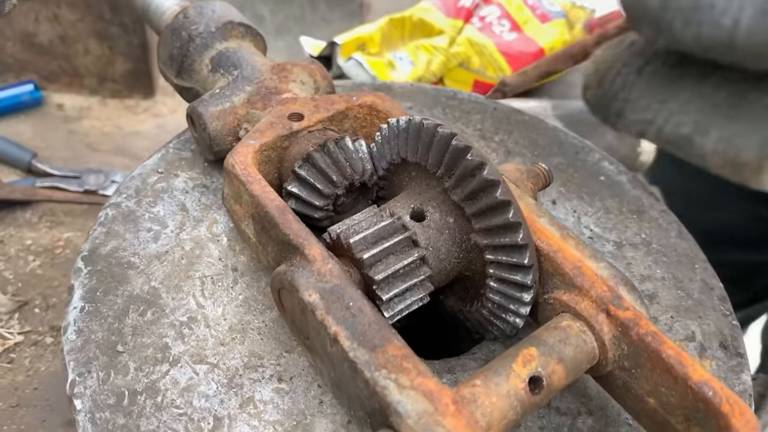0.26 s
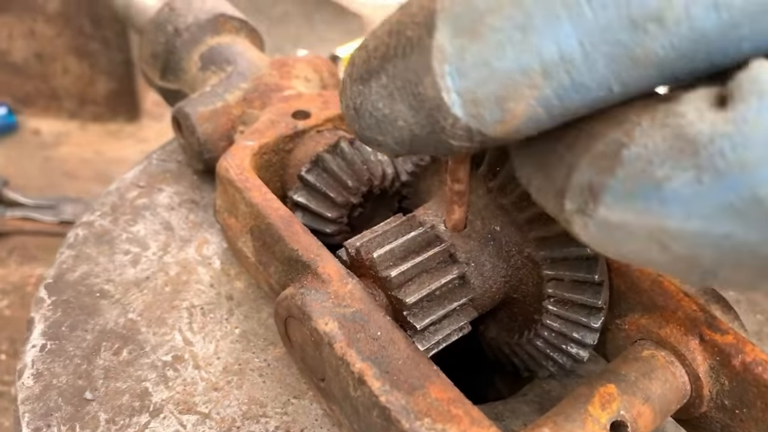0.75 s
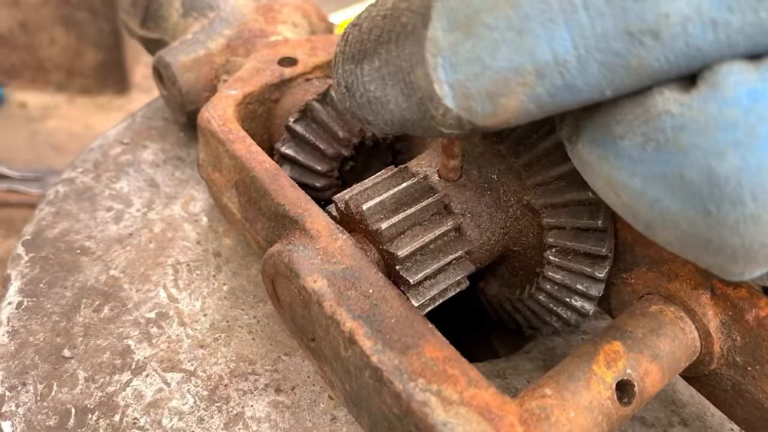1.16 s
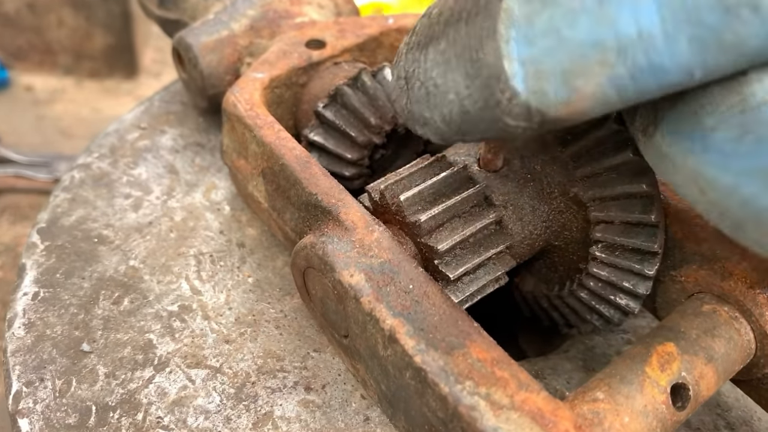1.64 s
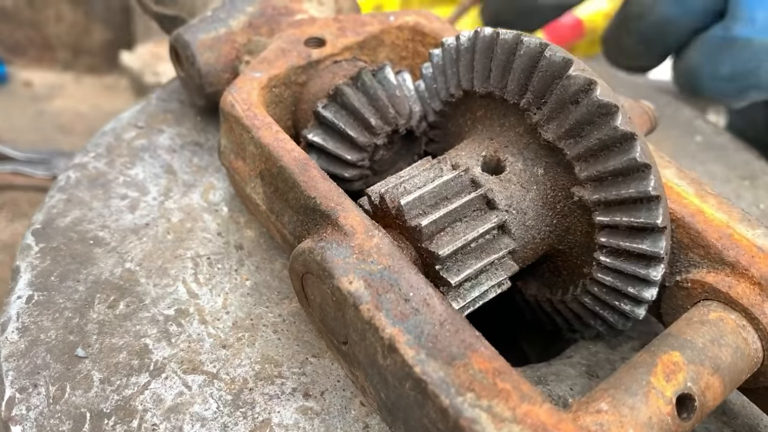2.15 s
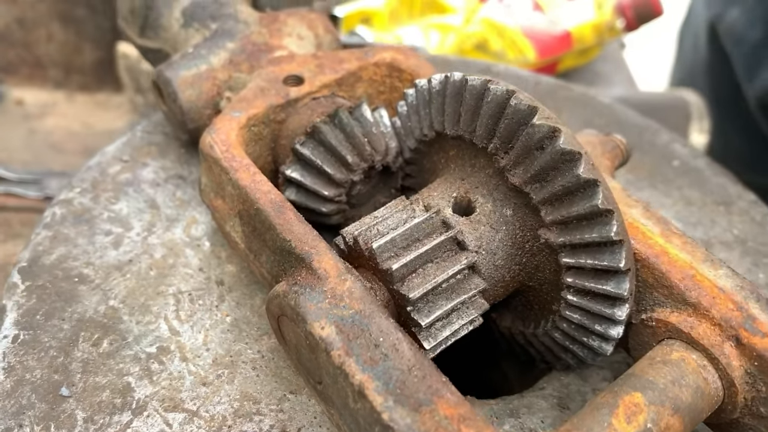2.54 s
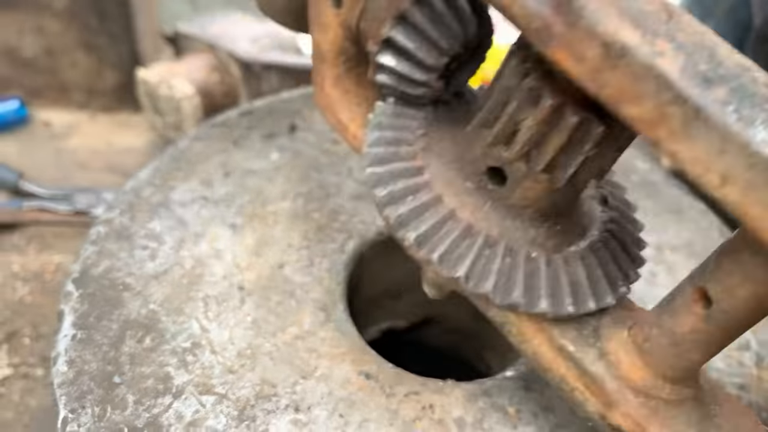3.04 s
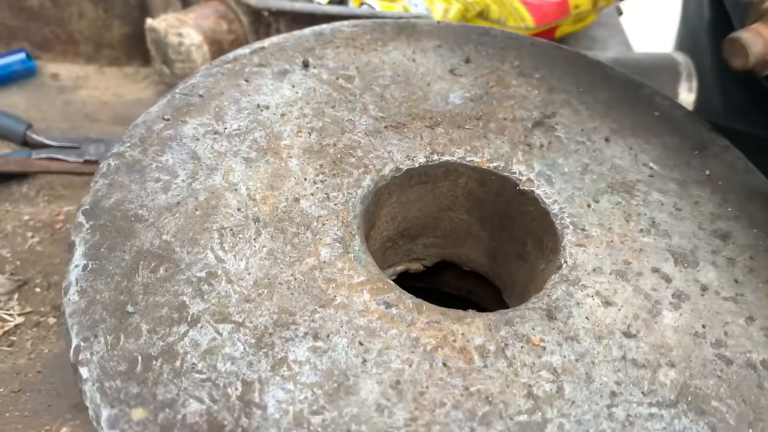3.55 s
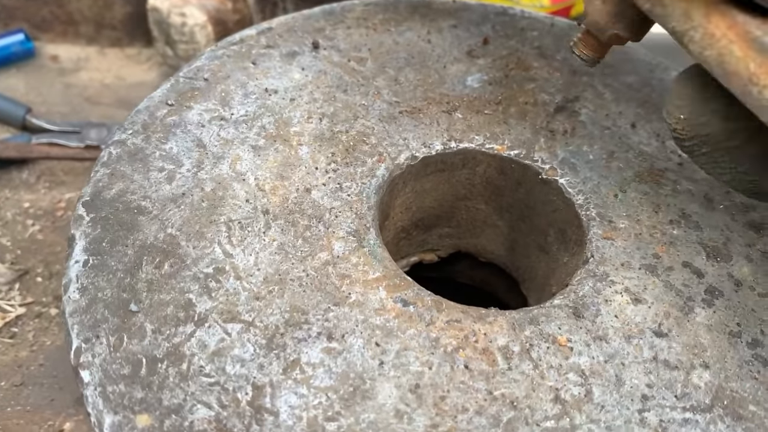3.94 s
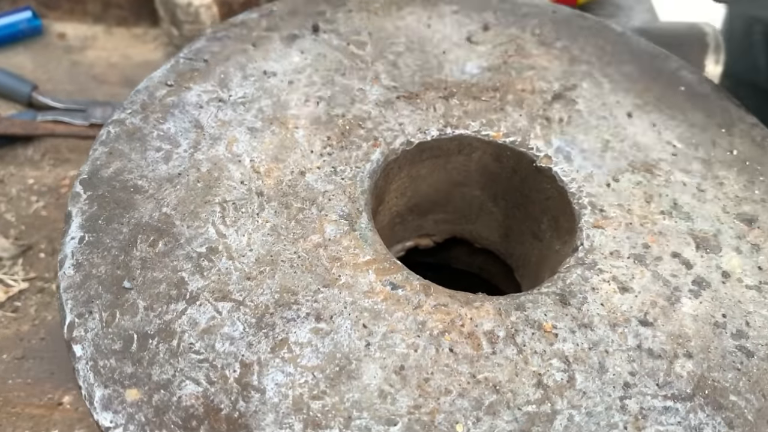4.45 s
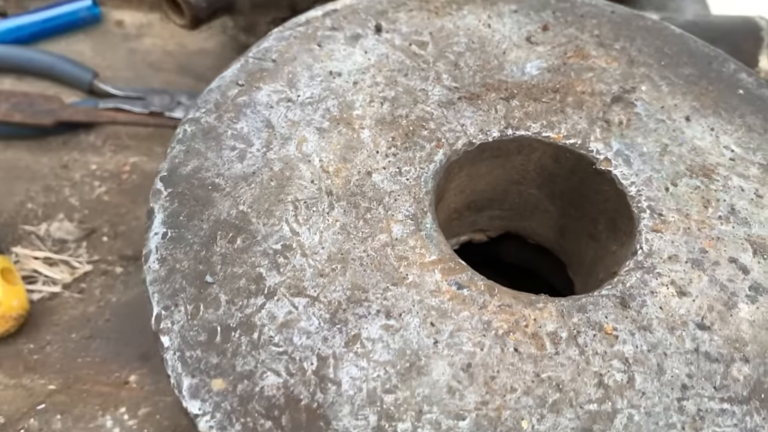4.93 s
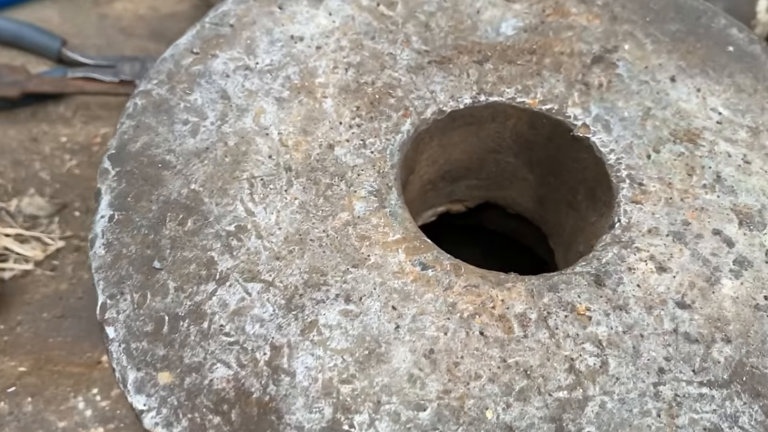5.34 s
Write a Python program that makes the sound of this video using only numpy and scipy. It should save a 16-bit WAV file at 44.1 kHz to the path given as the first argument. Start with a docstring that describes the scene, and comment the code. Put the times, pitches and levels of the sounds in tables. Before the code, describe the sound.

Close handheld stereo in an open workshop, over faint low rumble. Gloves rustle and steel scrapes rust; a sharp tick and clank come near one second. Just after two seconds a rapid cluster of loud clanks carries a short, very high pin ring. Quiet scuffs follow, then two hard, heavy clunks set the gear frame down.

```python
"""A gloved hand works a steel punch in the hole of a rusty gear set on a stone stand in an open workshop.
First glove rustle, rubbing and scraping, made of grainy shaped noise, lie over a low outdoor rumble.
Soon the punch ticks and the heavy frame clunks: short noise forces set ringing modes going, and the stand rocks.
After two seconds a pin rings as it is freed, from clean clicks; faint whines of narrow noise follow.
Late heavy clunks put the set down aside. Two microphone ports hear the treble out of step."""
import sys
import numpy as np
from scipy import signal
from scipy.fft import rfft, irfft, next_fast_len
from scipy.io import wavfile
from scipy.ndimage import uniform_filter1d

SR = 44100
rng = np.random.default_rng(int(sys.argv[2]) if len(sys.argv) > 2 else 0)


def wav_out(sig):
    """Save sig, one row per channel (or a flat mono array), as 16-bit PCM at SR to the path in sys.argv[1]."""
    wavfile.write(sys.argv[1], SR, np.round(np.clip(np.atleast_2d(sig).T, -1, 1) * 32767).astype(np.int16))


N = 246519  # length in samples

# Knocks of punch and gear set: t/s, clunk level/dB, clunk centre f/Hz, clank level/dB, tick level/dB, contact/ms
KNOCK_TABLE = [(0.108, -87, 550, -84, -53.5, 4.3), (0.157, -52, 230, -61, -97, 13),
               (0.298, -52.5, 776, -62, -92, 13), (0.718, -43, 324, -66, -71, 7.9),
               (0.893, -27.5, 348, -21, -24, 4.06), (0.984, -34, 393, -48, -55, 10.3),
               (1.028, -33, 500, -25, -22.5, 11.6), (1.067, -35.5, 470, -41.5, -54, 5.0),
               (1.102, -45.5, 483, -77, -76, 6.1), (1.424, -52.5, 377, -65, -63, 8.3),
               (1.602, -41, 390, -55.5, -55.5, 22), (1.635, -60, 460, -43, -38, 5),
               (1.71, -68.5, 450, -65.5, -84, 4.9), (2.002, -31.5, 430, -49, -62.5, 9.8),
               (2.1, -28.5, 530, -34.5, -19.5, 2), (2.141, -28, 540, -25, -21, 6.7),
               (2.164, -10.5, 670, -13, -39, 8.8), (2.207, -20.5, 570, -26, -40.5, 14),
               (2.226, -25.5, 510, -53.5, -57.5, 9.7), (2.262, -29, 448, -41, -71.5, 5.3),
               (2.425, -40, 433, -82, -81, 6.2), (2.603, -41.5, 422, -80, -74, 6.8),
               (3.111, -69, 552, -57.5, -66, 13.4), (3.241, -64.5, 745, -66, -46.5, 7.7),
               (4.506, -33.5, 373, -65.5, -58, 9.1), (4.533, -33.5, 337, -58.5, -65, 8.1),
               (4.595, -18.5, 545, -28, -42.5, 15.6), (4.602, -10, 620, -13, -24, 3.7),
               (4.617, -19, 620, -32, -50, 18.5), (4.834, -48, 427, -65, -70, 6.6),
               (4.874, -12, 673, -19, -32, 15), (4.884, -12.5, 620, -23.5, -33, 12)]
# Ringing modes of the heavy gear frame: f/Hz, level/dB, time to fall by 60 dB/s
FRAME_MODES = [(176, -14, .06), (240, -20, .05), (379.8, 1, 0.048), (441, -7, 0.08), (528, -5.5, 0.061),
               (609.5, 0.5, 0.044), (674, -14, 0.017), (1009, -7.5, 0.056), (1243, -2.5, 0.071),
               (1217, -17.5, 0.082)]
# Ringing modes of the gear teeth: f/Hz, level/dB, time to fall by 60 dB/s
TEETH_MODES = [(1766, -4, 0.15), (1874, -3, .04), (1994, 2, 0.037), (2400, -2.5, 0.013), (2450, 1, 0.033),
               (2665, 6, 0.03), (2900, 6, .04), (3230, -3.5, .04), (3540, -6.5, 0.033), (3870, -4, 0.057),
               (4400, -7.5, 0.073), (4640, -6, 0.048), (4980, -8.5, .03), (5370, -7.5, 0.024),
               (6780, -5.5, 0.0074), (6260, -6.5, .03), (6507, -10, 0.031)]


def from_db(db):
    """Turn decibels into a gain."""
    return 10 ** (np.asarray(db) / 20)


def rms_one(x):
    """Scale to an rms (average strength) of 1."""
    return x / np.sqrt(np.mean(x ** 2) + 1e-20)


def top_one(x):
    """Scale so that the loudest 5 ms have rms 1."""
    return x / np.sqrt(uniform_filter1d(x ** 2, size=220).max())


def band(x, low_hz, high_hz):
    """Keep the sound between two frequencies with a Butterworth band-pass."""
    sos = signal.butter(3, [low_hz, min(high_hz, .45 * SR)], "band", fs=SR, output="sos")
    return signal.sosfilt(sos, x)


def ring(force, hz, t60):
    """Drive one damped mode: a unit click sets a sine of height 1 ringing, 60 dB down after t60 seconds."""
    radius = from_db(-60 / (t60 * SR))
    angle = 2 * np.pi * hz / SR
    # the tiny offset keeps the filter's numbers from becoming too small
    return signal.lfilter([0, np.sin(angle)], [1, -2 * radius * np.cos(angle), radius * radius], force + 1e-18)


def drift(rate_hz):
    """Make a slow random wander of rms 1 by smoothing noise."""
    r = np.exp(-2 * np.pi * rate_hz / SR)
    noise = rng.standard_normal(N + SR)
    return rms_one(signal.lfilter([1], [1, -2 * r, r * r], noise)[SR:])  # skip the start-up second


def coloured(x, spectrum):
    """Shape noise by a spectrum in dB per Hz, joined up on a log frequency scale, and scale to rms 1."""
    size = next_fast_len(N)
    hz, db = np.transpose(spectrum)
    log_hz = np.log(np.maximum(np.arange(size // 2 + 1) * SR / size, 1))
    gain = from_db(np.interp(log_hz, np.log(hz), db, -80, -80))
    return rms_one(irfft(rfft(x, size) * gain, size)[..., :N])


def rubbing(spectrum, alike, grit_db, flicker_db):
    """Rub with noise of uneven grains whose level flickers, partly different in each channel."""
    grains = from_db(grit_db * np.minimum(rng.exponential(1, N), 5))
    shared, own = rng.standard_normal((2, N)) * grains
    alike = np.clip(alike, -.995, .995)
    pair = np.sqrt(1 + alike) * shared + np.sqrt(1 - alike) * own * [[1], [-1]]
    return coloured(pair * from_db(flicker_db * drift(25)), spectrum)


def strike(force, modes, stretch, centre_hz, octaves, scatter_db=3):
    """Feed a force into the modes of a body: those near centre_hz ring most, each with some luck."""
    luck_db = rng.normal(0, scatter_db, len(modes))
    rings = 0
    for (hz, db, t60), more_db in zip(modes, luck_db):
        near_db = -6 * (np.log2(hz / centre_hz) / octaves) ** 2
        rings = rings + from_db(db + near_db + more_db) * ring(force, hz, t60 * stretch) / np.sqrt(t60)
    return band(rings, centre_hz / 2.2, centre_hz * 3.0)  # soft contact and small body: no boom, no edge


def blows(table, modes, scatter_db):
    """Send clean clicks into lightly damped modes; each click wakes each mode by a slightly random amount."""
    at = [round(s * SR) for s, db in table]
    blow_db = np.array(table)[:, 1]
    out = np.zeros(N)
    for hz, level_db, t60 in modes:
        clicks = np.zeros(N)
        clicks[at] = from_db(blow_db + level_db + rng.normal(0, scatter_db, len(at)))
        out += ring(clicks, hz, t60)
    return out


def handling():
    """Rumble, rubbing on stone, steel scraping on rust and glove cloth: shaped noises with moving levels."""
    # Background levels: t/s, rumble level/dB, dull rub level/dB, scrape level/dB, rustle level/dB
    background = [(0.0, -60, -70.5, -73, -63.5), (0.28, -56.5, -65.5, -72, -71),
                  (0.78, -55, -66.5, -68.5, -66.5), (1.05, -50, -63, -65, -66),
                  (1.25, -56.5, -75, -63, -84), (1.341, -58, -72.5, -83.5, -78),
                  (1.421, -58, -70.5, -72, -72), (1.499, -56, -65, -73.5, -70.5),
                  (1.66, -58, -65, -69.5, -70), (1.78, -59.5, -69, -73.5, -67.5),
                  (1.95, -58.5, -66, -69, -60), (2.18, -48, -52.5, -54.5, -62.5),
                  (2.38, -57.5, -70, -75.5, -70.5), (2.699, -62, -74.5, -81.5, -76),
                  (2.92, -58.5, -72.5, -77, -69), (3.2, -60, -66.5, -69.5, -66),
                  (3.551, -62, -69.5, -69.5, -64), (3.65, -59.5, -75, -76, -69.5),
                  (3.95, -61.5, -74.5, -75, -69), (4.25, -60, -66, -65.5, -59),
                  (4.48, -58.5, -66.5, -69, -62), (4.64, -49, -62, -69, -72), (4.8, -58, -63.5, -72.5, -73),
                  (4.97, -52.5, -63.5, -70, -69.5), (5.25, -66.5, -77, -84.5, -79),
                  (5.38, -57, -73, -75, -72.5), (5.59, -61.5, -68, -77.5, -75.5)]
    # Spectra of the four noises, each: f/Hz, level per Hz/dB
    rumble_spectrum = [(12, -38), (20, -10.5), (59, -2), (124, -8), (182, -15), (211, -17.5), (300, -28),
                       (390, -50.5), (660, -120)]
    rub_spectrum = [(110, -22), (170, 0.5), (270, -3), (520, -7), (800, -9), (1400, -13.5), (2000, -36.5)]
    scrape_spectrum = [(900, -25), (1500, -0.5), (2500, -1.5), (4000, -2), (6000, -4.5), (7600, -4.5),
                       (9000, -28.5)]
    rustle_spectrum = [(7000, -21.5), (8500, -2.5), (11000, -3), (13500, 0), (15800, 4.5), (16600, -24.5)]
    s, *levels = np.transpose(background)
    rumble_db, rub_db, scrape_db, rustle_db = [np.interp(np.arange(N) / SR, s, level) for level in levels]
    rumble = rubbing(rumble_spectrum, .8, grit_db=0, flicker_db=2.5)
    rub = rubbing(rub_spectrum, 0.21, grit_db=3.0, flicker_db=2.5)
    scrape = rubbing(scrape_spectrum, 0.34, grit_db=3.0, flicker_db=2.0)
    rustle = rubbing(rustle_spectrum, 1.0, grit_db=1.5, flicker_db=1.5)
    steady = from_db(rumble_db) * rumble + from_db(rub_db) * rub
    steady += from_db(scrape_db) * scrape + from_db(rustle_db) * rustle
    return steady + scuffs(rub, scrape, rustle)


def knocks():
    """Rough faces chatter for some ms: the frame clunks, the teeth clank, the contact itself cracks and ticks."""
    even_clank_hz, tick_db_per_octave = 4580, 24.5  # clank centre if tick equals clank; sharper ticks clank higher
    ring_factor, ring_per_db = .45, 0.22  # ring length if clank equals clunk; duller knocks ring longer
    soft_db, soft_reach = -30, 1.6  # softer clunks are padded: little above this multiple of their centre
    tick_reach = 3.3  # top of the tick over the clank centre
    out = np.zeros((2, N + SR))
    t = np.arange(SR // 4) / SR
    for s, clunk_db, clunk_hz, clank_db, tick_db, contact_ms in KNOCK_TABLE:
        clank_hz = even_clank_hz * 2 ** ((tick_db - clank_db) / tick_db_per_octave)
        clank_hz = np.clip(clank_hz, 1800, 6800)
        stretch = np.clip(ring_factor + ring_per_db * (clunk_db - clank_db), .15, 1)
        pan_db = rng.normal(0, 2)

        phase = t / (contact_ms / 1000)
        chatter = np.minimum(phase * 3.6, 1) * np.exp(-phase ** 2)
        force, own = rng.standard_normal((2, len(t))) * chatter
        wide = force + .65 * own * [[1], [-1]]  # the teeth radiate unevenly to both sides

        crack = top_one(band(wide, clank_hz / 2.1, clank_hz * 1.685))
        clank = top_one(strike(wide, TEETH_MODES, stretch, clank_hz, octaves=9.7)) + from_db(1) * crack
        clunk = strike(force, FRAME_MODES, stretch, clunk_hz, octaves=.9)
        if clunk_db < soft_db:
            clunk = band(clunk, 100, clunk_hz * soft_reach)
        tick = band(force, 9100, np.clip(clank_hz * tick_reach, 10500, 16300))

        sound = from_db(clunk_db) * top_one(clunk) + from_db(clank_db) * top_one(clank)
        sound += from_db(tick_db) * top_one(tick)
        at = round(s * SR)
        out[:, at:at + len(t)] += sound * from_db([[pan_db / 2], [-pan_db / 2]])
    return out[:, :N]


def echoes(x):
    """Nearby things scatter a short, dull tail of fading noise, different in each channel."""
    t60_s, rise_s = .07, 0.022
    t = np.arange(SR // 4) / SR
    tail = band(rng.standard_normal((2, len(t))), 200, 7000)
    tail = tail * from_db(-60 * t / t60_s) * np.minimum(t / rise_s, 1)
    tail = tail / np.sqrt(np.sum(tail ** 2) / 2)
    return signal.fftconvolve(x[None], tail, axes=1)[:, :N]


def scuffs(rub, scrape, rustle):
    """Short strokes switch the rubbing on; it sets the frame humming and the nearest teeth singing."""
    # Scuffs and rattles: start t/s, end t/s, rub level/dB, scrape level/dB, rustle level/dB, scrape centre f/Hz
    strokes = [(0.156, 0.187, -53, -64, -70, 2000), (0.246, 0.324, -64.5, -93, -102, 1720),
               (0.472, 0.577, -61, -74, -66, 1600), (0.616, 0.658, -59, -69.5, -58.5, 2800),
               (0.855, 0.888, -65, -59, -47.5, 1890), (0.877, 1.018, -61, -74, -63, 2610),
               (1.024, 1.072, -49, -53, -43.5, 2600), (1.122, 1.297, -74, -59, -62, 3550),
               (1.163, 1.254, -50.5, -47.5, -50, 4700), (1.396, 1.483, -63.5, -67, -59.5, 5540),
               (1.592, 1.702, -60, -65, -60, 2580), (1.992, 2.043, -48, -59, -82, 2020),
               (2.015, 2.093, -47, -83, -80, 1500), (2.094, 2.178, -43.5, -47.5, -33.5, 6900),
               (2.133, 2.197, -34.5, -32, -47, 2640), (2.16, 2.25, -32, -40.5, -59.5, 1458),
               (2.25, 2.316, -38, -67, -56.5, 1500), (2.309, 2.4, -60, -74, -71.5, 2020),
               (3.017, 3.059, -83, -70.5, -64.5, 1910), (3.102, 3.17, -67.5, -66.5, -64, 2104),
               (3.241, 3.285, -81, -64, -55, 6450), (3.345, 3.514, -88, -85, -64.5, 1536),
               (3.57, 3.587, -68.5, -64, -84, 3430), (3.716, 3.767, -71.5, -70, -77.5, 2910),
               (3.819, 3.859, -80.5, -69, -75.5, 2400), (3.971, 4.036, -67, -67, -57, 2110),
               (4.479, 4.504, -56.5, -59, -54, 7330), (4.522, 4.582, -51, -50.5, -72, 5300),
               (4.575, 4.607, -41, -52.5, -59, 4600), (4.607, 4.661, -29.5, -54, -60, 1500),
               (4.667, 4.716, -54.5, -57.5, -70, 6650), (4.708, 4.744, -64, -50.5, -68.5, 4900),
               (4.879, 4.923, -28, -41.5, -50, 1740), (4.921, 5.006, -51, -58.5, -60, 1570),
               (5.046, 5.139, -72.5, -63, -77, 3820)]
    near_s = .014  # a stroke edge this close to a knock belongs to it
    fall_db, swell_db = 10, 7  # strokes set off by a knock die away, those that run into one swell
    hum_db, sing_db = 0.5, 1  # ringing relative to the plain rubbing
    rise, fade = round(.007 * SR), round(.02 * SR)  # samples
    out = np.zeros((2, N))
    for start, end, rub_db, scrape_db, rustle_db, hz in strokes:
        begun, ended = [min(abs(knock[0] - s) for knock in KNOCK_TABLE) < near_s for s in (start, end)]
        tilt_db = -swell_db if ended else fall_db * begun
        span = slice(round(start * SR) - rise // 2, round(end * SR) + fade // 2)
        i = np.arange(span.stop - span.start)
        gate = np.clip(np.minimum(i / rise, i[::-1] / fade), 0, 1) ** 2
        gate = gate * from_db(tilt_db * (.5 - i / len(i)))

        frame = strike(rub[:, span], FRAME_MODES, 1.0, 500, octaves=0.26)
        hum = band(rub[:, span], 290, 2100) + from_db(hum_db) * rms_one(frame)
        teeth = strike(scrape[:, span], TEETH_MODES, 0.9, hz, octaves=.33, scatter_db=5)
        sing = scrape[:, span] + from_db(sing_db) * rms_one(teeth)
        stroke = from_db(rub_db) * rms_one(hum) + from_db(scrape_db) * rms_one(sing)
        stroke += from_db(rustle_db) * rustle[:, span]
        out[:, span] += gate * stroke
    return out


def stand_rocks():
    """The stand rocks on the ground: soft, heavy contacts excite one low mode, slightly apart in each channel."""
    # Rocking blows: t/s, level/dB
    rock_blows = [(.718, -39.5), (.897, -28.5), (.99, -25), (1.02, -29), (1.43, -36.5), (1.6, -43),
                  (2.06, -38), (2.6, -46.5), (3.11, -46), (4.055, -45), (4.38, -51.5), (4.6, -39.5),
                  (4.88, -39), (5.17, -55), (5.47, -44.5)]
    mode = (55, 0, .3)  # f/Hz, level/dB, time to fall by 60 dB/s
    stand = np.array([blows(rock_blows, [mode], scatter_db=1.5) for ear in range(2)])
    return signal.sosfilt(signal.butter(2, 150, fs=SR, output="sos"), stand)  # low-pass for the soft contact


def pin_rings():
    """The loose pin rings high and clear: clean clicks drive its lightly damped modes."""
    # Blows on the pin: t/s, level/dB
    pin_blows = [(2.099, -17), (2.116, -23.5), (2.143, -20), (2.158, -23), (2.17, -29.5), (2.187, -33.5)]
    # Ringing modes of the pin: f/Hz, level/dB, time to fall by 60 dB/s
    pin_modes = [(6725, -13, .14), (6939, -17, .1), (12845, -6, .08), (12889, 0, .12), (13085, -5, .1),
                 (14244, -5, .05)]
    return band(blows(pin_blows, pin_modes, scatter_db=3.5), 5300, 14000)


def whines():
    """Narrow bands of noise with an octave above them come and go softly."""
    # Faint whines: start t/s, end t/s, f/Hz, level/dB, level of the octave above/dB
    whine_table = [(2.498, 2.69, 1122, -70.5, -93), (4.257, 4.44, 1706, -65.5, -93),
                   (5.321, 5.579, 1674, -73.5, -77.5)]
    width_hz, edge_s = 250, .03
    out = np.zeros((2, N))
    t = np.arange(N) / SR
    for start, end, hz, db, octave_db in whine_table:
        gate = np.clip(np.minimum(t - start, end - t) / edge_s, 0, 1)
        for centre_hz, level_db in (hz, db), (2 * hz, octave_db):
            noise = rng.standard_normal((2, N))
            tone = band(noise, centre_hz - width_hz / 2, centre_hz + width_hz / 2)
            out += gate * from_db(level_db) * rms_one(tone + tone[::-1] / 2)  # channels partly shared
    return out


def scene():
    """Add the handling noise, the knocks and pin with their echoes, the stand and the whines."""
    echo_db = -21
    background = handling()
    hits = knocks() + pin_rings()
    return background + hits + from_db(echo_db) * echoes(hits.mean(0)) + stand_rocks() + whines()


def record(dry):
    """The ports shift the channels' phases against each other; peaks are rounded, the top is cut."""
    # Microphone ports: f/Hz, lead of the left channel/rad (negative: it lags)
    port_lead = [(0, 0), (1200, -.1), (6500, -.3), (7300, -1.9), (8600, -3.1), (11000, -6.2), (13500, -9.4),
                 (16700, -12.5)]
    cutoff_hz = 17100
    size = next_fast_len(N + 4096)
    lead = np.interp(np.arange(size // 2 + 1) * SR / size, *np.transpose(port_lead))
    shift = np.exp(.5j * lead * [[1], [-1]])  # half the lead for each channel, in opposite directions
    wet = irfft(rfft(dry, size) * shift, size)[:, :N]
    wet = wet / (1 + np.abs(wet) ** 4) ** .25  # rounds the peaks
    return .98 * signal.sosfilt(signal.cheby2(14, 90, cutoff_hz, fs=SR, output="sos"), wet)


dry = scene()
out = record(dry)
wav_out(out)
```